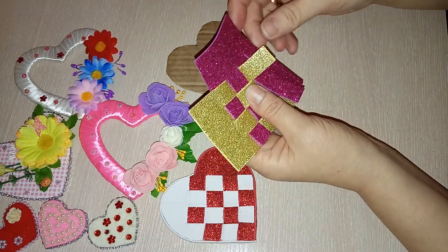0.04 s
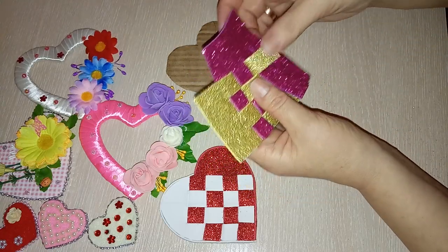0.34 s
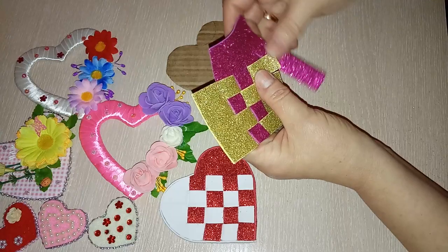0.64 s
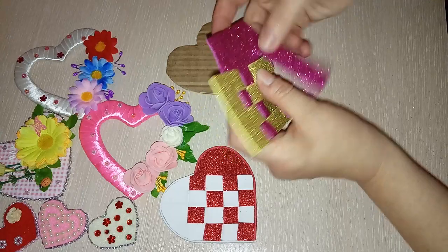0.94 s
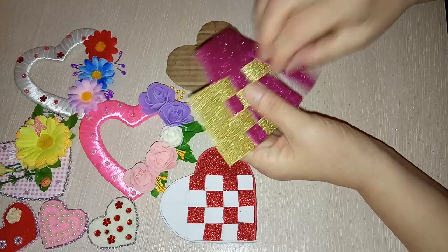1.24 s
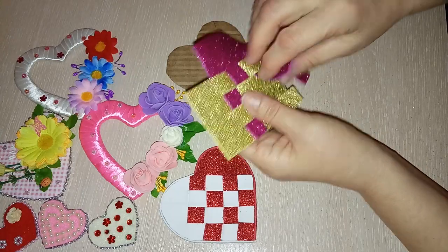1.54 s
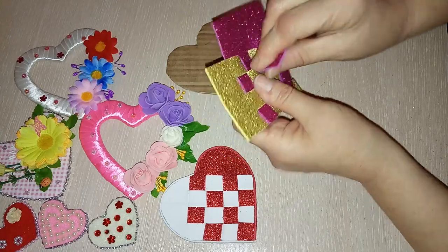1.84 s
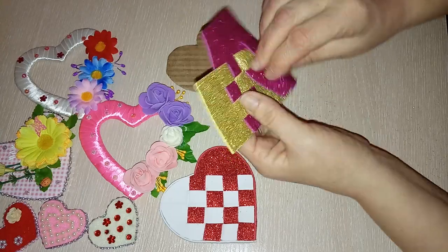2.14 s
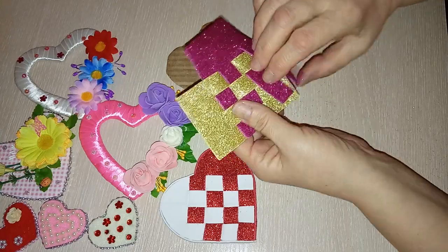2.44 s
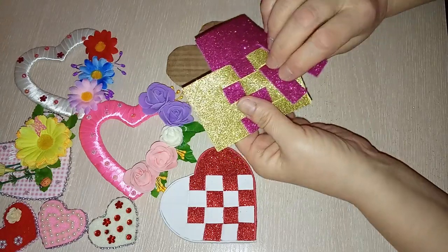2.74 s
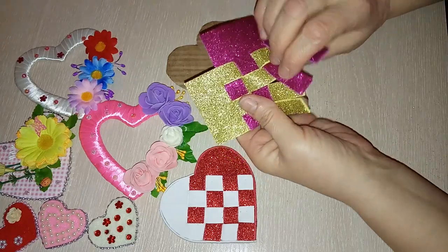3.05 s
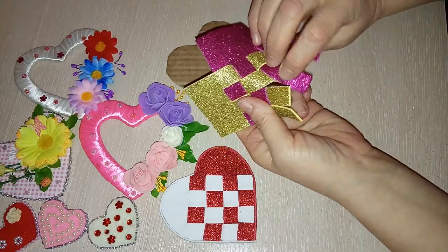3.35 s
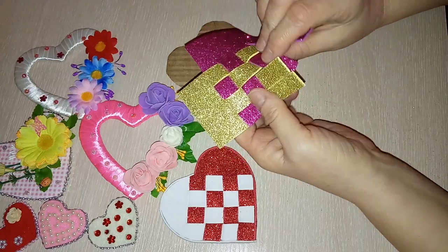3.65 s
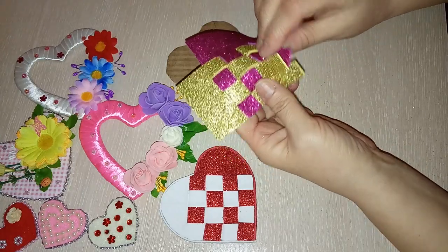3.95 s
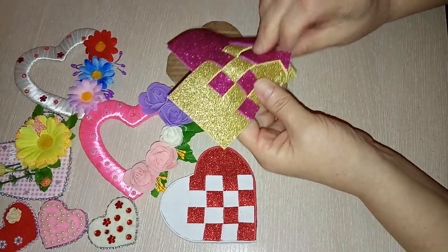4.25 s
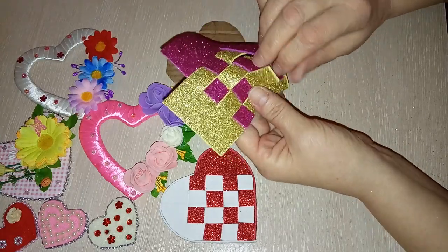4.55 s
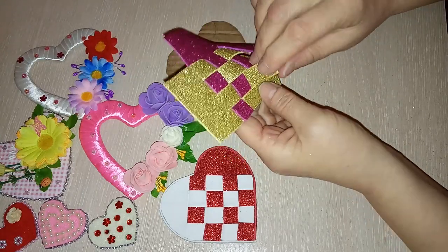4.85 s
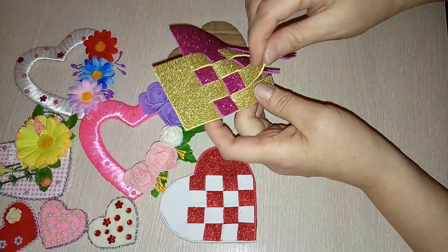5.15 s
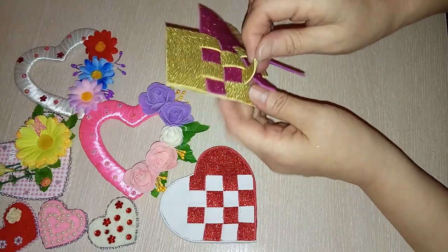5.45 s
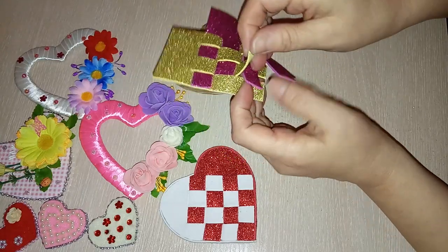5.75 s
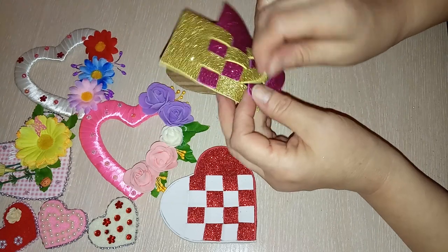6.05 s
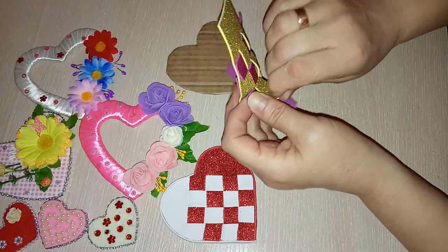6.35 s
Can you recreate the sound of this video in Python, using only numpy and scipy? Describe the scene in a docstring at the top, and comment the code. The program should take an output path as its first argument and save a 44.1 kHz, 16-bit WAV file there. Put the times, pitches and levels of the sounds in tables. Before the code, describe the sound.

Close, gritty rubbing of glitter-coated foam strips comes in uneven strokes, with small snaps, crackling ticks and a few faint squeaks.

```python
"""In a small quiet room, hands weave strips of glitter-coated craft foam over a table, close by.
Each push drags a strip over its neighbour: glitter grains catch and let go, rasping and shaking the
strip's free end. Edges flick free, large flakes tick, and bare foam squeaks under a fingertip.
The hands bump the sheets and rumble faintly; the room adds a short echo, and a soft hiss lies behind."""
import sys
import numpy as np
from scipy import signal
from scipy.fft import rfft, irfft, next_fast_len
from scipy.io import wavfile
from scipy.ndimage import uniform_filter1d

SR = 44100
rng = np.random.default_rng(int(sys.argv[2]) if len(sys.argv) > 2 else 0)


def inscribe(sig):
    """Save sig as 16-bit PCM at rate SR to the path in sys.argv[1].

    A 1-D sig is mono; a 2-D sig holds one channel per row.
    Samples are clipped to [-1, 1] before scaling.
    """
    pcm = np.round(np.clip(np.atleast_2d(sig).T, -1, 1) * 32767)
    wavfile.write(sys.argv[1], SR, pcm.astype(np.int16))


N = 282681

# pushes of one strip over another; "flex" is the ring of its free end, "bite" that of its cut edge:
# (start [s], rise [s], fall [s], level [dB], brightness [dB per octave], flex [dB], bite [dB])
PUSHES = [(0.141, 0.0045, 0.11, -65.5, -7, 0, -11), (0.322, 0.029, 0.072, -41.5, -2, 1.5, 3.5),
          (0.44, 0.018, 0.19, -57, -3.5, -20, 9), (0.53, 0.078, 0.2, -39, -1, -6, 1),
          (0.692, 0.078, 0.06, -56, -8, 7.5, 10), (0.77, 0.021, 0.023, -38.5, -1, -18, -3),
          (0.934, 0.038, 0.0085, -54.5, 2.5, 7, 12.5), (0.981, 0.017, 0.025, -35.5, -2, -4, -5),
          (1.139, 0.02, 0.016, -59, -3.5, -18.5, -9), (1.206, 0.025, 0.073, -64, -4, 22, -18),
          (1.246, 0.044, 0.068, -43, -4, 3, 10), (1.325, 0.037, 0.064, -46, -5, -11, 8.5),
          (1.434, 0.042, 0.087, -46.5, -3, 1.5, -1), (1.63, 0.0025, 0.03, -62, 11, 23, 12.5),
          (1.652, 0.013, 0.023, -45.5, 9.5, 13, -6), (1.753, 0.043, 0.04, -36.5, -2.5, -2.5, 1),
          (1.879, 0.052, 0.077, -45.5, -5, -8, 6.5), (1.986, 0.024, 0.064, -39, -3, -13, 2),
          (2.038, 0.06, 0.22, -51, -4.5, 3.5, 5), (2.279, 0.096, 0.09, -41, -6.5, 1, 0),
          (2.532, 0.037, 0.1, -56, 1, 7, -4.5), (2.669, 0.039, 0.048, -58, 5.5, -6.5, 7),
          (2.736, 0.082, 0.057, -54, 4, 2.5, 7), (2.856, 0.0015, 0.11, -43.5, -4, 4.5, 1.5),
          (2.953, 0.008, 0.035, -59.5, -11, 18, 2), (3.032, 0.036, 0.089, -50, -0.5, 7, -23),
          (3.107, 0.12, 0.03, -63.5, 8.5, 19.5, 8), (3.398, 0.069, 0.019, -50.5, 2.5, -6.5, 1),
          (3.428, 0.064, 0.082, -42, -5, 3.5, -2.5), (3.57, 0.087, 0.043, -57, -4.5, 9.5, 2.5),
          (3.728, 0.059, 0.11, -50, 4.5, -2, 5), (3.899, 0.013, 0.1, -44, 1, 8.5, -11),
          (4.014, 0.015, 0.03, -53.5, -1.5, 5, -8), (4.088, 0.0035, 0.058, -45.5, -1, 13.5, 5),
          (4.156, 0.026, 0.042, -35, 4.5, 2.5, 5), (4.201, 0.019, 0.065, -46.5, -8, 5, 4),
          (4.282, 0.062, 0.084, -52, -0.5, 9.5, 8.5), (4.391, 0.017, 0.1, -57, 2.5, 0.5, 0),
          (4.51, 0.023, 0.018, -50.5, 4.5, -18.5, -14), (4.55, 0.081, 0.1, -47.5, -0.5, 12, 3),
          (4.747, 0.0024, 0.0044, -55.5, 6.5, -5, -10), (4.798, 0.025, 0.026, -44.5, -1.5, 5.5, -8),
          (4.921, 0.018, 0.052, -65.5, -4.5, 10.5, -11.5), (5.06, 0.0044, 0.029, -53.5, 4, -2.5, -5),
          (5.075, 0.0079, 0.019, -42.5, -2, 4.5, 5.5), (5.169, 0.039, 0.1, -67, 10.5, 13.5, -17.5),
          (5.271, 0.036, 0.062, -63.5, 8, 15, 5), (5.34, 0.04, 0.042, -56.5, 4, -0.5, 7),
          (5.44, 0.02, 0.02, -62, 4, 1.5, -11.5), (5.494, 0.018, 0.038, -68, 12, 16, 7.5),
          (5.572, 0.012, 0.12, -65.5, 13.5, 17.5, 0), (5.622, 0.032, 0.032, -44, 1, 6.5, 1.5),
          (5.687, 0.033, 0.026, -57, 4.5, 8, 0.5), (5.785, 0.012, 0.023, -60, 9, -1.5, -2.5),
          (5.807, 0.028, 0.016, -49, -0.5, -0.5, 9.5), (5.916, 0.028, 0.027, -70, 3.5, 7, 7),
          (5.971, 0.021, 0.027, -59, 9.5, 13.5, 6), (6.002, 0.0045, 0.015, -44, -2, -1, -6),
          (6.021, 0.11, 0.034, -59.5, -4.5, -7, 7), (6.165, 0.012, 0.018, -69, 7.5, -4.5, 2),
          (6.266, 0.024, 0.029, -52, -1, 3, -1.5), (6.36, 0.043, 0.02, -65, 12, -9, 4.5),
          (6.398, 0.01, 0.041, -38, 5, 9, 8.5)]
# edges that catch and flick free:
# (time [s], strength [dB], skid [s], free end [Hz], flex [dB], cut edge [Hz], bite [dB])
FLICKS = [(0.366, -19.5, .002, 520, 3, 7450, 0), (0.389, -7, 0.0045, 900, 6.5, 3500, -6),
          (0.577, -22, .001, 1380, 18, 3030, 7), (0.7736, 6, 0.0015, 873, 7.5, 3600, 2.5),
          (0.955, -22, 0.0026, 1190, 11, 3620, 8.5), (0.989, -6.5, 0.0085, 1220, 7, 5620, 5.5),
          (1.001, -14.5, 0.0027, 1300, -8, 3500, 15), (1.209, -40, 0.00035, 760, 34, 5500, 27.5),
          (1.286, -9.5, 0.0089, 1300, -3, 6600, 1), (1.52, -21, 0.0018, 1000, -9.5, 3720, 15),
          (1.655, -20, 0.0014, 1540, 14, 2900, 20), (1.666, -7, 0.0018, 1680, 8.5, 3530, 6.5),
          (1.952, -19, 0.0044, 1120, -3, 2980, 17), (2.432, -8.5, 0.0062, 1100, -1.5, 3440, 9.5),
          (2.937, -24, 0.0031, 900, 18, 2200, 8), (2.961, -27, 0.01, 850, 18, 2390, -2),
          (3.229, -12, 0.00058, 905, 11, 3970, 2.5), (4.203, -15, 0.0052, 1010, -2, 2670, 17),
          (4.236, -17, 0.0032, 1170, 14.5, 2800, 0), (5.087, -13, 0.0025, 960, -5.5, 2680, 1)]
# single large flakes that tick: (time [s], strength [dB])
TICKS = [(0.459, -26.5), (0.516, -24.5), (0.618, -18.5), (0.641, -18), (0.666, -16.5), (0.751, -21),
         (0.77, -23.5), (1.036, -36), (1.055, -34.5), (1.797, -26), (1.913, -42), (1.944, -22),
         (1.954, -15.5), (1.96, -24), (1.986, -30), (2.086, -27), (2.113, -35), (2.201, -29), (2.207, -36),
         (2.219, -30), (2.284, -32), (2.582, -26.5), (2.589, -27.5), (2.699, -27), (2.818, -25),
         (2.894, -25), (2.965, -28.5), (3.066, -23.5), (3.105, -25), (3.21, -32.5), (3.442, -20),
         (3.449, -22), (3.533, -24), (3.624, -30.5), (3.66, -25.5), (3.801, -23.5), (3.937, -25),
         (4.009, -25), (4.018, -23), (4.356, -33), (5.575, -28.5), (6.04, -37.5)]
# bare foam squeaking under a fingertip: (start [s], length [s], pitch [Hz], level [dB])
SQUEAKS = [(.145, 0.045, 2574, -64), (.193, 0.024, 2670, -81), (1.278, 0.021, 2780, -52),
           (3.12, 0.062, 1290, -69), (5.495, 0.06, 1467, -79.5), (5.575, 0.064, 1614, -68),
           (5.975, 0.059, 1482, -68.5), (6.275, 0.021, 1670, -62), (6.278, 0.019, 2750, -59)]
# soft bumps of the hands on the sheets: (start [s], length [s], resonance [Hz], level [dB])
BUMPS = [(.35, 0.046, 426, -60.5), (0.764, 0.03, 119, -72), (0.982, 0.035, 377, -56),
         (1.25, 0.11, 380, -68), (1.313, 0.093, 350, -63), (1.66, 0.016, 436, -51.5),
         (1.874, 0.086, 430, -66.5), (2.07, 0.078, 71, -86), (3.223, 0.08, 127.4, -70),
         (3.895, 0.041, 433, -58.5), (4.591, 0.064, 442, -72.5)]
# tone colour of the glitter's rasp: (frequency [Hz], level [dB])
RASP_COLOUR = [(200, -38.5), (600, -31), (1000, -16), (1600, -4), (2100, -6), (2700, 0), (3800, -2),
               (4500, 0.5), (5300, 1.5), (6600, 0.5), (8200, -8), (9500, 3), (11500, 3), (13000, -4.5),
               (16000, -14.5)]
# pitch of the strip's free end, higher where the fingers hold it short: (time [s], pitch [Hz])
FREE_END_PITCH = [(0.37, 1110), (0.6, 1280), (0.73, 1350), (0.79, 887), (0.99, 1284), (1.23, 1260),
                  (1.47, 1020), (1.66, 1650), (1.8, 1200), (2.1, 800), (2.39, 1000), (2.6, 1510),
                  (2.81, 1610), (2.86, 990), (2.97, 880), (3.08, 1270), (3.5, 1149), (3.92, 1405),
                  (4.13, 992), (4.62, 1393), (5.08, 1353), (5.6, 1538), (6.25, 1556), (6.4, 1030)]
# the hollow between fingers and sheets, changing with the grip:
# (time [s], cut edge [Hz], peak [Hz], peak gain [dB], low dip gain [dB], high dip [Hz], its gain [dB])
HOLLOWS = [(0.16, 2630, 5000, -1, -2, 3940, -8), (0.62, 2800, 5700, 3, -13.5, 4400, -6),
           (1.33, 2745, 6520, 7.5, -4, 3860, 1), (1.5, 3700, 6500, 5.5, 0, 4800, -2),
           (1.8, 3300, 5100, 2.5, -7, 4480, -1), (2.02, 2670, 5700, -0.5, -6, 3650, -2),
           (2.17, 2900, 5940, 4, 0, 4170, -10), (2.379, 3000, 4100, -1.5, 1, 6540, -3),
           (2.6, 3050, 5900, 9, -11, 4380, -12), (2.8, 2520, 6280, -5, -9, 5030, 0),
           (2.92, 2390, 6400, 4.5, 1, 4300, -6), (3.08, 2420, 5900, 0.5, 1.5, 3440, -14.5),
           (3.5, 2900, 5890, 4.5, -6, 4200, 1.5), (3.79, 2720, 6130, -2, -2, 3840, -12),
           (3.95, 2980, 6060, 4.5, -0.5, 3660, 0), (4.2, 2730, 6400, 1.5, -3, 4200, -0.5),
           (4.36, 2730, 6250, 8, 2, 3600, -4.5), (4.64, 2600, 5970, 6, 2, 3665, -6.5),
           (5.3, 2700, 4640, 2.5, -11.5, 3600, -8.5), (5.63, 2620, 4780, 10, -1.5, 3700, -13),
           (5.83, 2690, 4000, -1.5, -2.5, 6930, -2), (6.01, 2750, 6310, 4, -7.5, 3400, -8.5),
           (6.11, 2680, 4560, 3.5, -4, 3360, -4.5)]
# narrow resonances of the space over the table: (frequency [Hz], width [Hz], boost [dB])
TABLE_RESONANCES = [(432, 64, 4.5), (660, 120, 6), (794, 66, 5), (1006, 15, 6.5), (1272, 32, 6),
                    (1389, 42, 5), (1525, 33, 4.5), (1677, 10, 5.5), (2766, 74, 2.5), (3687, 120, 6),
                    (6100, 47, 5)]
# tone colour of the background hiss: (frequency [Hz], relative level [dB])
HISS_COLOUR = [(25, -6), (80, -2), (200, -4), (600, -10.5), (1400, -12), (3000, -11.5), (8000, -19.5),
               (10500, -14.5), (16000, -34)]
# level of the background hiss, almost silent for the first third of a second, then steady with
# two brief dips: (time [s], level [dB])
HISS_LEVEL = [(0, -86.5), (0.305, -99), (0.331, -75), (3.3, -79.5), (3.348, -87.5), (3.424, -79),
              (4.98, -81), (5.021, -92.5), (5.06, -78.5), (6.4, -79.5)]

USUAL_SKID_S = .0018  # how fast a typical skid dies away


def rubbing(usual_db=-50, grains_per_s=3600, catches_per_s=110, sparks_per_s=80, pose_s=.07):
    """Flakes catch and let go as a strip is pushed: slow pushes crackle, fast ones blur into a rasp."""
    out = np.zeros(N)
    for start, rise, fall, db, bright_db, flex_db, bite_db in PUSHES:
        n = int((rise + fall) * SR)
        t = np.arange(n) / SR
        speed = np.sin(np.pi / 2 * np.interp(t, [0, rise, rise + fall], [0, 1, 0])) ** 1.15
        glitter = grains(grains_per_s * np.sqrt(speed * undb(db - usual_db)))
        slide = undb(-7) * noise(n)  # the soft foam back slides smoothly
        catches = undb(-4) * grains(np.full(n, catches_per_s), spread_db=1.75)  # bigger flakes hold on
        force = (glitter + slide + catches) * undb(2.5 * judder(n, rate=200))
        force = force / np.std(force) * speed * undb(db + 1.2)
        flex_hz = np.interp(start + rise, *np.transpose(FREE_END_PITCH))
        flex_q = 2.1 * undb(.24 * (usual_db - db))  # a light grip lets the end ring longer
        thud_db = flex_db - 25  # the end passes a share of its motion on to the sheet
        # one pose of the hands blends into the next
        for k, pose in enumerate(poses()):
            share = np.maximum(1 - np.abs(t / pose_s - k), 0)
            held = np.flatnonzero(share)
            if len(held):
                dulling_db = 3 * (1 - np.max(speed[held]))  # slower is duller
                edge_hz, hollow = cupped_hands(start + np.mean(t[held]))
                rasp = foam((force * share)[held], pose, bright_db - dulling_db, flex_hz, flex_db,
                            bite_db, thud_db, flex_q=flex_q, bite_hz=edge_hz, hollow=hollow)
                add(out, start + t[held[0]], rasp)
        # loose flakes crackle on top in gritty clusters
        clusters = undb(8 * judder(n, rate=70))
        sparks = grains(sparks_per_s * clusters) * np.sqrt(speed)
        add(out, start, flake(sparks * undb(db - 15), bright_db=2.5))
    return out


def flicks():
    """Edges flick free: a short skid taps, a long one is gritty, and a hard flick thuds the sheet."""
    out = np.zeros(N)
    for start, db, skid_s, flex_hz, flex_db, bite_hz, bite_db in FLICKS:
        skid_db = -6 + 20 * np.log10(skid_s / USUAL_SKID_S)
        force = release(skid_db, skid_s) * undb(db)
        flick = foam(force, poses()[0], bright_db=-3, flex_hz=flex_hz, flex_db=flex_db, bite_db=bite_db,
                     thud_db=2 * db, echo_share=.4, bite_hz=bite_hz, overtone_db=-4)
        add(out, start, flick)
    return out


def ticks():
    """Large flakes let go one by one, each with a bright tick."""
    out = np.zeros(N)
    for start, db in TICKS:
        add(out, start, flake(release(skid_db=-2) * undb(db - .5), bright_db=10))
    return out


def squeaks(waver=.052, wavers_per_s=297, rough_db=2, gain_db=10.5):
    """Bare foam vibrates under a fingertip: short swelling tones of unsteady pitch and loudness."""
    out = np.zeros(N)
    for start, length, hz, db in SQUEAKS:
        n = int(length * SR)
        pitch_hz = hz * (1 + waver * judder(n, wavers_per_s))
        phase = 2 * np.pi * np.cumsum(pitch_hz) / SR
        loudness = np.hanning(n) * undb(db + gain_db + rough_db * judder(n, wavers_per_s))
        add(out, start, np.sin(phase) * loudness)
    return out


def bumps():
    """A soft, uneven push on a limp sheet sets off a low thud that dies quickly."""
    out = np.zeros(N)
    for start, length, hz, db in BUMPS:
        n = int(length * SR)
        thud = shape(noise(n) * np.hanning(n), lambda f: resonance(f, hz, q=3), size=4096)
        add(out, start, thud * np.sqrt(n / np.sum(thud ** 2)) * undb(db))
    return out


def grains(rate, spread_db=3.5):
    """Random clicks of flakes letting go, many small and a few large, about `rate` each second."""
    moment, depth, side = rng.random((3, SR // 2))[:, :len(rate)]
    size = undb(spread_db * np.minimum(-np.log(1 - depth), 4))
    pulses = (moment < rate / SR) * size * np.sign(side - .5)
    return pulses / np.sqrt(np.mean(pulses ** 2) + 1e-9)


def judder(n, rate):
    """Uneven sticking and slipping: glides to a new random value `rate` times a second."""
    hold = max(int(SR / rate), 2)
    steps = np.repeat(noise(n // hold + 1), hold)
    return uniform_filter1d(steps, hold)[:n]


def release(skid_db, skid_s=USUAL_SKID_S, size=1024):
    """Something lets go: a bending wave runs down the strip while the edge skids over a few flakes."""
    f = np.fft.rfftfreq(size, 1 / SR)
    delay_s = .001744 * np.sqrt(1000 / np.maximum(f, 1))  # low waves travel more slowly
    wave = irfft(np.exp(-2j * np.pi * f * delay_s))
    skid = noise(size) * np.exp(-np.arange(size) / SR / skid_s)
    return (wave + undb(skid_db) * skid / np.linalg.norm(skid)) / np.hypot(1, undb(skid_db))


def foam(force, pose, bright_db, flex_hz, flex_db, bite_db, thud_db,
         echo_share=.75, flex_q=2, bite_hz=3000, overtone_db=-22, hollow=np.ones_like):
    """A force sounds through the hard glitter, the stiff cut edge, the free end and the limp sheet."""
    # the fingers move both pitches by up to a tenth of an octave
    end_hz, edge_hz = np.array([flex_hz, bite_hz]) * 2 ** (.2 * (pose[0, :2] - .5))

    def gain_at(f):
        tilt = undb(bright_db * np.log2(np.clip(f, 2000, 11500) / 5000))
        rasp = colour(RASP_COLOUR, f) * tilt
        bite = undb(bite_db) * resonance(f, edge_hz, q=2.6)
        overtone = undb(overtone_db) * resonance(f, 1.9 * end_hz, 2 * flex_q)  # a second way to bend
        flex = undb(flex_db) * (resonance(f, end_hz, flex_q) + overtone)
        thud = undb(thud_db) * resonance(f, hz=440, q=2.07)
        scratch = np.hypot(rasp, bite) * near_echoes(f, pose, echo_share)
        return hollow(f) * np.sqrt(scratch ** 2 + flex ** 2 + thud ** 2)
    return shape(force, gain_at)


def flake(force, bright_db):
    """A single flake is too light to shake the strip much, so it sounds thin and bright."""
    return foam(force, poses()[0], bright_db, flex_hz=1350, flex_db=-2.5, bite_db=-5, thud_db=-22.5)


def poses(count=8, surfaces=10):
    """Random finger positions, each with a distance and a strength (0-1) for every near surface."""
    return rng.random((count, 2, surfaces))


def near_echoes(f, pose, echo_share, nearest_s=.0003985, farthest_s=.007):
    """Echoes between fingers and table boost some frequencies and weaken others, anew for each pose."""
    lag_s = nearest_s * (farthest_s / nearest_s) ** pose[0]  # most surfaces are very close
    weight = pose[1] - .5
    echoes = np.sum(np.exp(-2j * np.pi * np.outer(f, lag_s)) * weight, axis=1) / np.linalg.norm(weight)
    ripple = np.abs(1 + echo_share * echoes) ** 1.45  # repeated bounces sharpen the peaks
    return ripple / np.sqrt(np.mean(ripple ** 2))


def cupped_hands(time_s):
    """The grip at one moment: the cut edge's pitch, and the tone colour of the hollow under the hands."""
    times, *columns = np.transpose(HOLLOWS)
    edge_hz, peak_hz, peak_db, low_db, high_hz, high_db = (np.interp(time_s, times, c) for c in columns)

    def hollow(f):
        peak = peak_db * resonance(f, peak_hz, q=6)
        low_dip = low_db * resonance(f, hz=2120, q=5.5)
        high_dip = high_db * resonance(f, high_hz, q=4.5)
        return undb(peak + low_dip + high_dip)
    return edge_hz, hollow


def hand_rumble(strips):
    """Moving fingers press the sheets with a faint low rumble that grows with the rubbing."""
    effort = np.abs(uniform_filter1d(strips ** 2, SR // 20)) ** .125
    rumble = shape(rng.standard_normal(N), lambda f: resonance(f, hz=115, q=.86))[:N]
    return undb(-56) * effort * rumble


def room(x, first_echo_s=.0069, tail_db=-13.5, split_hz=6300, low_fade_s=.15, high_fade_s=.11):
    """Near surfaces colour the sound; the furnished room adds a short tail whose treble dies first."""
    t = np.arange(SR // 2) / SR
    tail = 0
    for band, fade_s in (("low", low_fade_s), ("high", high_fade_s)):
        scatter = signal.sosfilt(signal.butter(4, split_hz, band, fs=SR, output="sos"), noise(len(t)))
        tail = tail + scatter * undb(-60 * t / fade_s) * (t > first_echo_s)
    response = undb(tail_db) * tail / np.linalg.norm(tail)
    response[0] += 1  # the direct sound

    def table_gain(f):
        boost_db = sum(db * resonance(f, hz, hz / width) for hz, width, db in TABLE_RESONANCES)
        return undb(boost_db - 4)
    return signal.fftconvolve(x, shape(response, table_gain))[:N]


def background_hiss():
    """A faint hiss comes in after a third of a second and stays under everything, dipping twice."""
    hiss = shape(rng.standard_normal(N), lambda f: colour(HISS_COLOUR, f))[:N]
    level_db = np.interp(np.arange(N) / SR, *np.transpose(HISS_LEVEL))
    return hiss / np.std(hiss) * undb(level_db)


def undb(db):
    """Turn decibels into a gain, the number a signal is multiplied by."""
    return 10 ** (np.asarray(db) / 20)


def colour(points, f):
    """Gain at frequencies f, read from an outline of (frequency [Hz], level [dB]) points."""
    hz, db = np.transpose(points)
    return undb(np.interp(np.log(f), np.log(hz), db))


def resonance(f, hz, q):
    """Gain of something that rings at hz; a higher q makes the peak narrower."""
    return 1 / (1 + (q * (f / hz - hz / f)) ** 2)


def shape(x, gain_at, size=1024):
    """Filter x with the gain gain_at(f), leaving about `size` extra samples for it to ring."""
    n = 2 * next_fast_len((len(x) + size) // 2)
    f = np.maximum(np.fft.rfftfreq(n, 1 / SR), 1)
    cepstrum = irfft(np.log(gain_at(f) + 1e-9))
    # fold it so that the ringing comes after each click, never before
    cepstrum[1:n // 2] *= 2
    cepstrum[n // 2 + 1:] = 0
    return irfft(rfft(x, n) * np.exp(rfft(cepstrum)))


def noise(n):
    """Up to half a second of white noise."""
    return rng.standard_normal(SR // 2)[:n]


def add(out, start_s, x):
    """Mix x into out from start_s on."""
    i = int(np.clip(start_s * SR, 0, N))
    out[i:i + len(x)] += x[:N - i]


def scene():
    """The foam strips in the room, over the rumble and the hiss, as one channel."""
    strips = squeaks() + rubbing() + flicks() + ticks() + bumps()
    return (room(strips) + hand_rumble(strips) + background_hiss())[None]


def record(dry, top_hz=16100):
    """Cut away the very highest treble."""
    return signal.sosfilt(signal.ellip(8, .2, 70, top_hz, fs=SR, output="sos"), dry)


dry = scene()
out = record(dry)
inscribe(out)
```